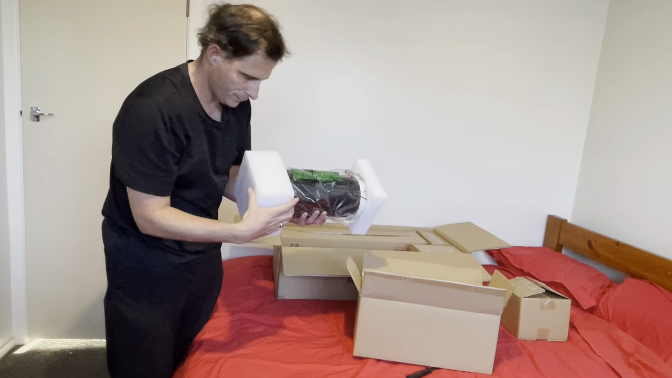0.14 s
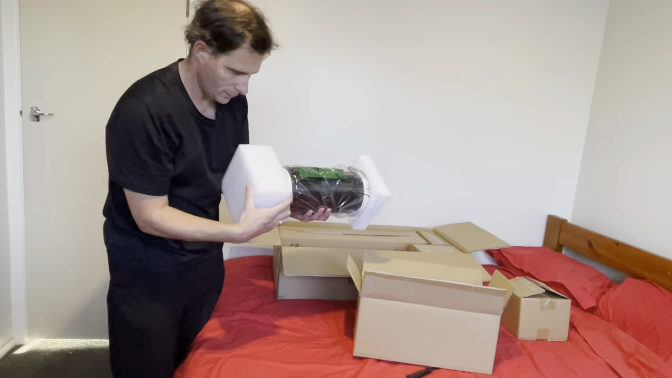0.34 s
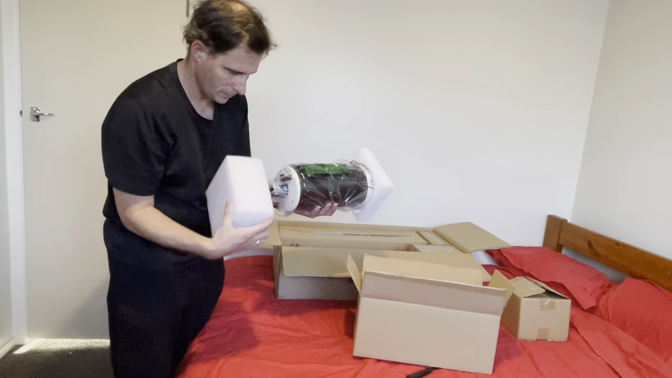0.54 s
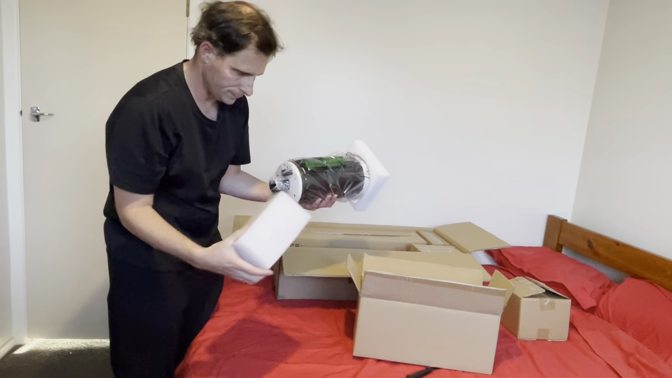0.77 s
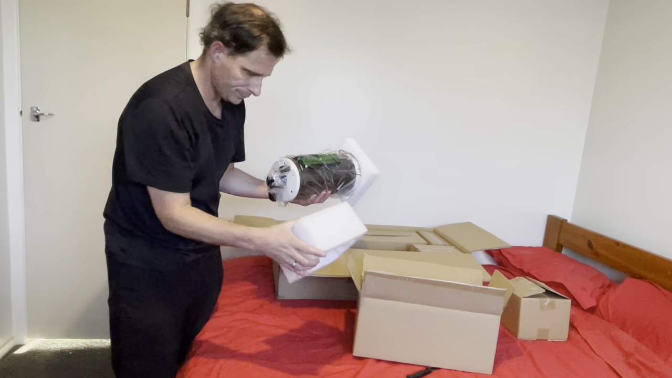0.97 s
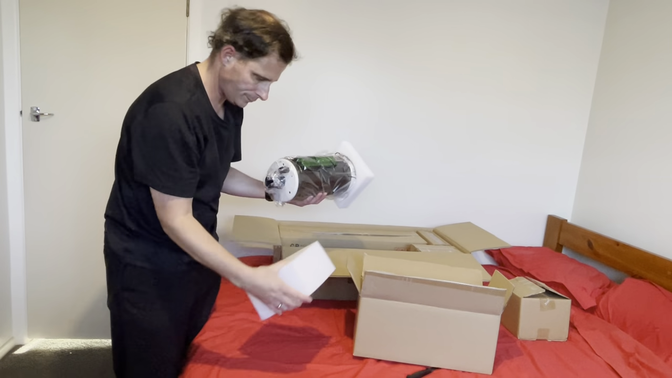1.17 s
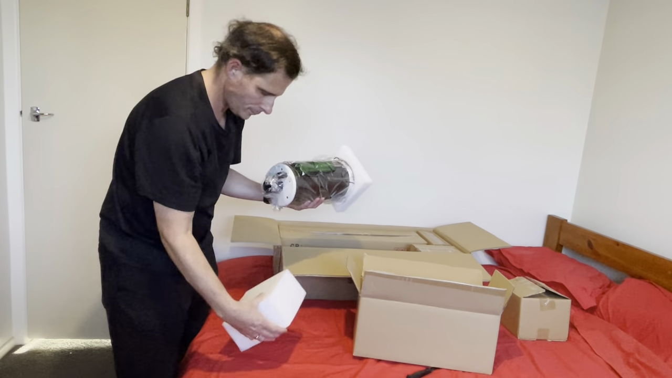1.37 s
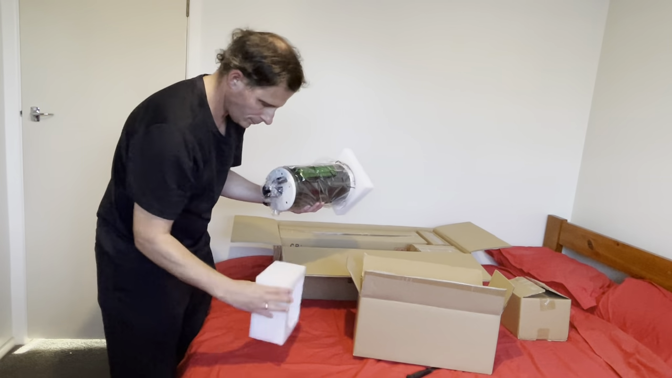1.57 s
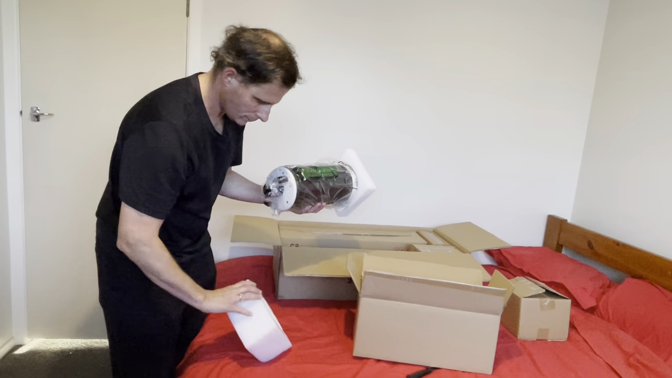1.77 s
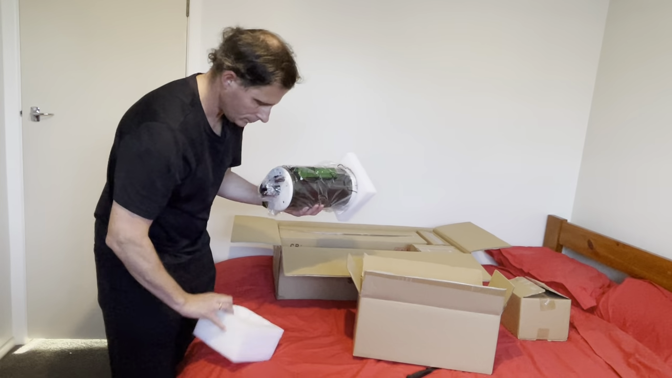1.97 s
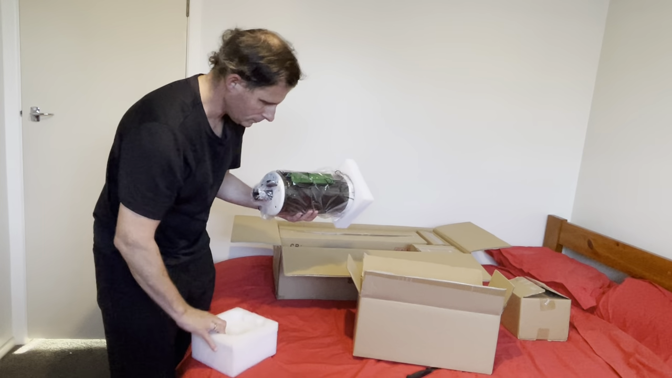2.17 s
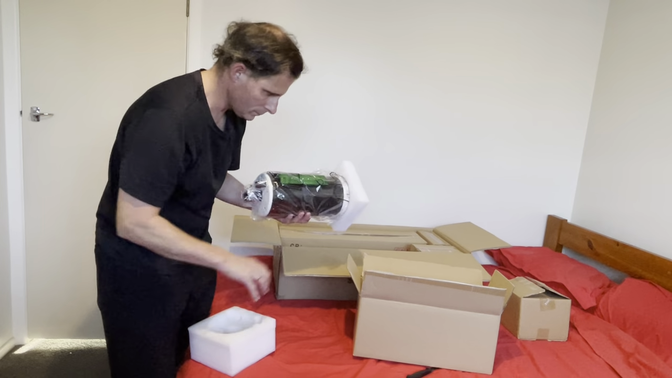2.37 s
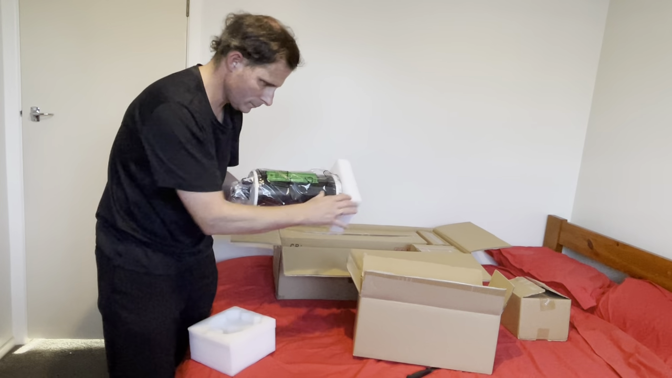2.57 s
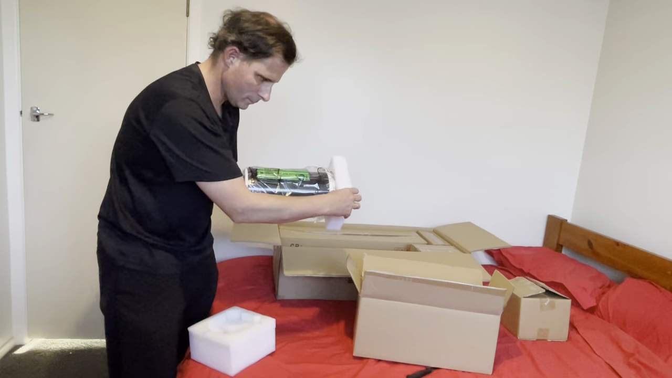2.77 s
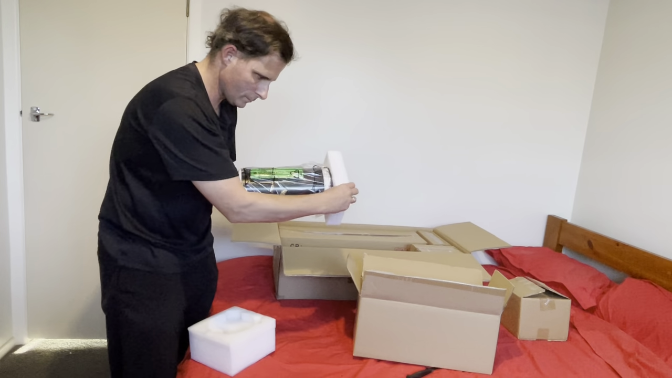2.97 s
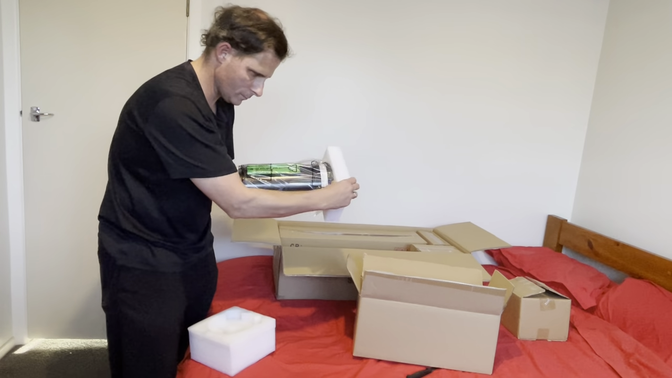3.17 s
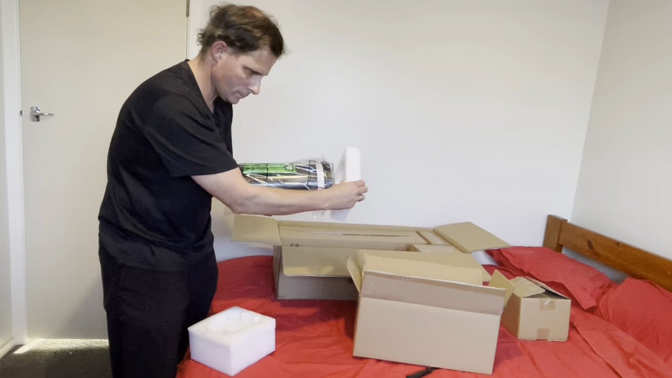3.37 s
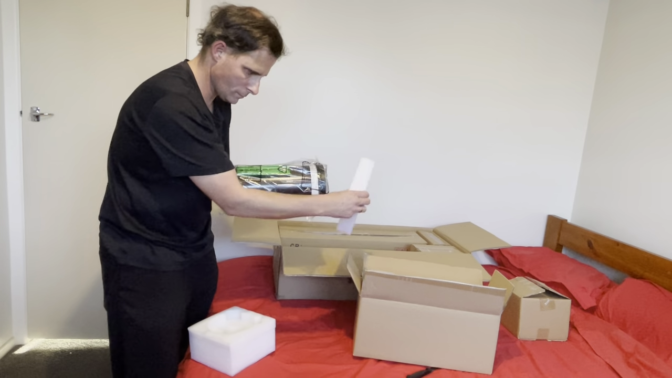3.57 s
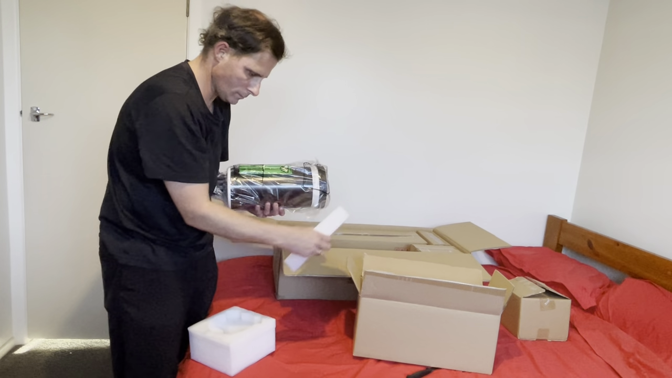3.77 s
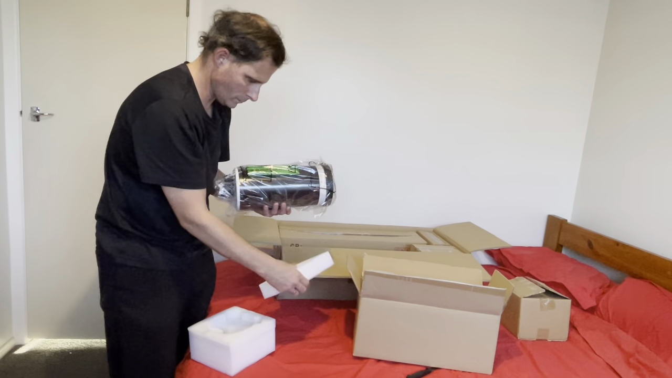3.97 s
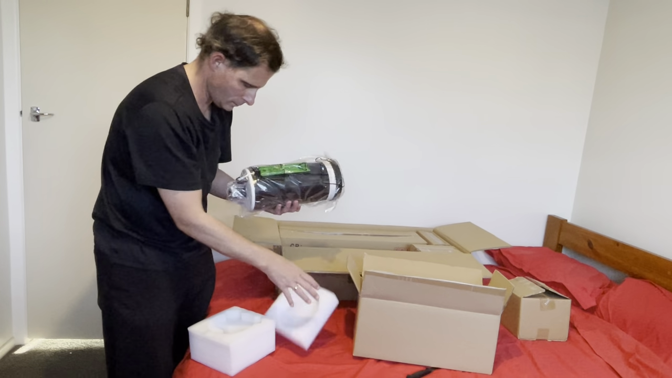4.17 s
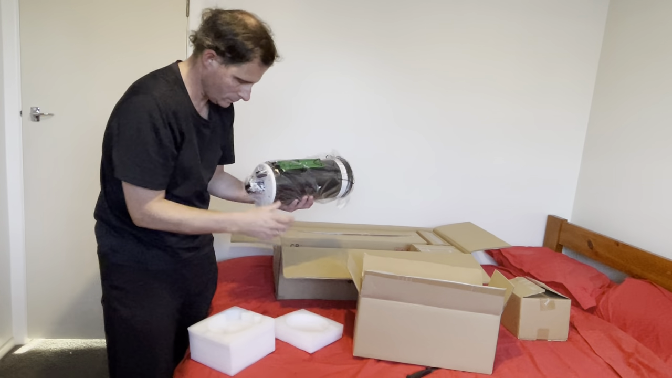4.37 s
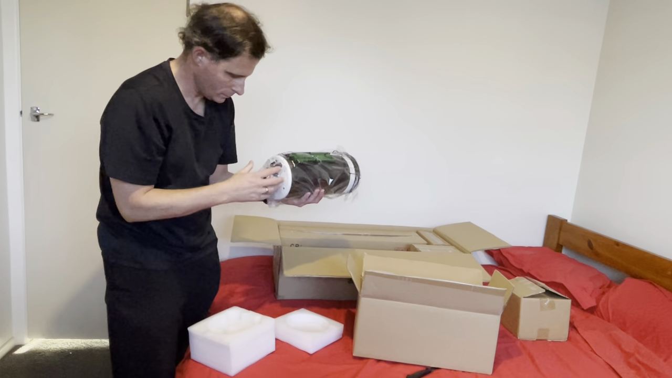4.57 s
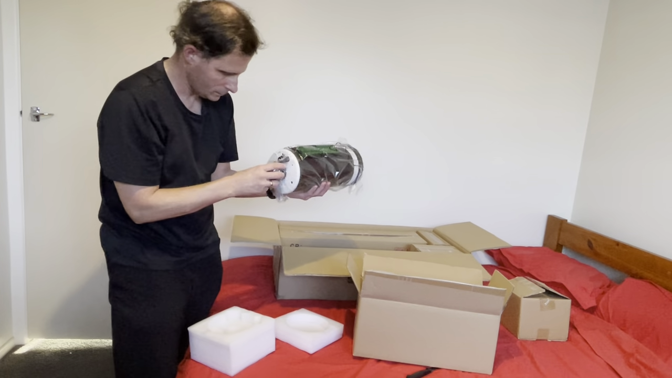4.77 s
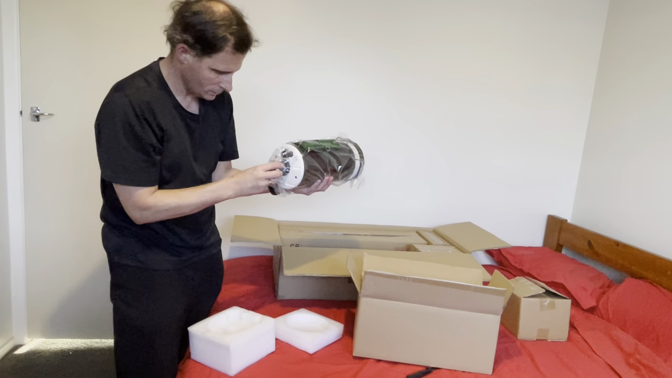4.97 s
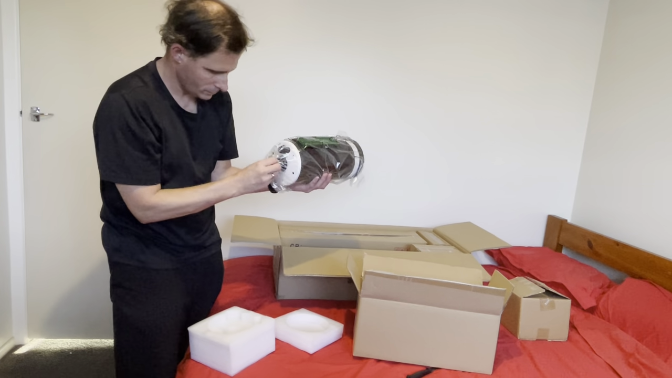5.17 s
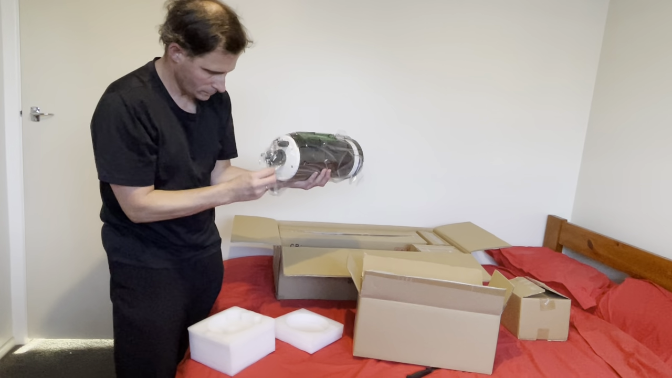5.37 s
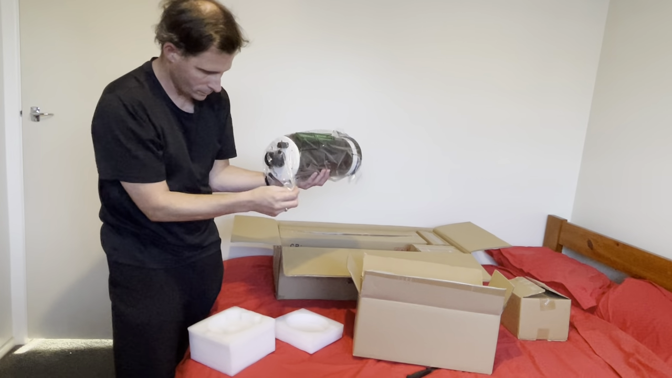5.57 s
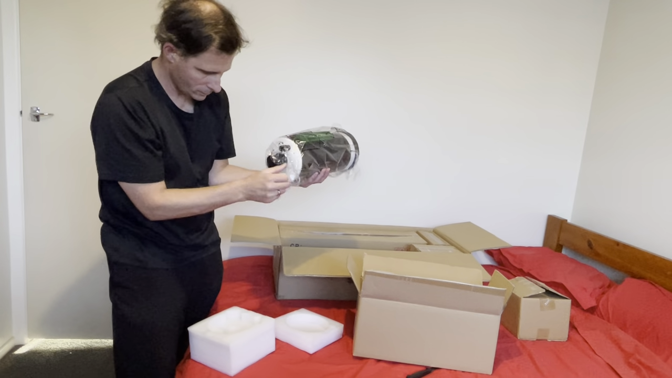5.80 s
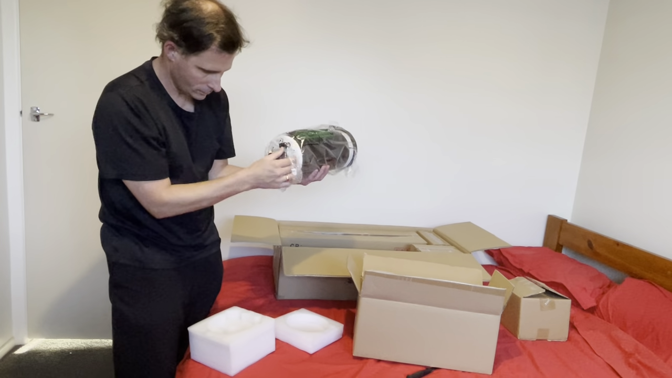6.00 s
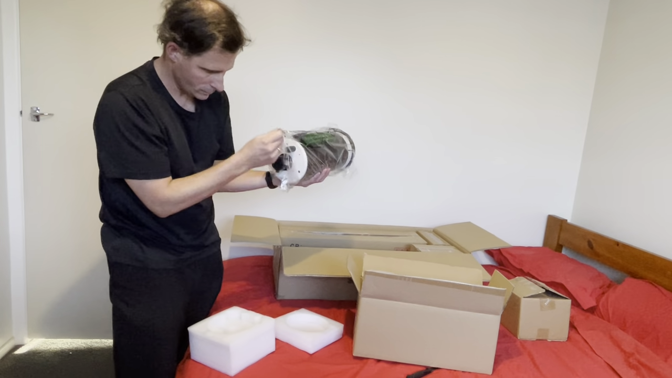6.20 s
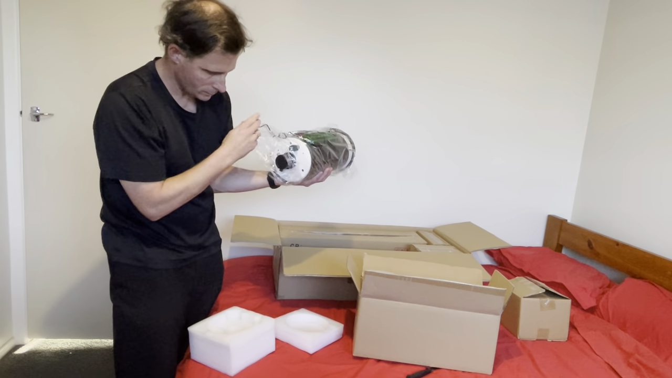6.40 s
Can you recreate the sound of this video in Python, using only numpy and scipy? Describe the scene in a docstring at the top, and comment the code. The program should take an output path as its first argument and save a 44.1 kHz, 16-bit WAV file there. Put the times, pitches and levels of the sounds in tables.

```python
"""A foam end cap scrapes and squeaks in tiny slips off a cylinder wrapped in plastic film, turns in
the hand and thuds onto a bed. The film crinkles under a fresh grip; the second cap comes off at 3.3 s
and is laid down too. From 4.5 s fingers feel for an edge, then peel the film back in countless small
buckles and a few sharp snaps. A small bedroom answers throughout, two microphones a few steps away."""
import sys
import numpy as np
from scipy import signal
from scipy.fft import rfft, irfft, next_fast_len
from scipy.io import wavfile
from scipy.ndimage import map_coordinates

SR = 44100
rng = np.random.default_rng(int(sys.argv[2]) if len(sys.argv) > 2 else 0)


def to_wav(sig):
    """Store sig (one row per channel, or 1-D mono) as 16-bit WAV at the path in sys.argv[1].

    Samples outside -1..1 are clipped; the rate is SR.
    """
    pcm = np.clip(np.atleast_2d(sig), -1, 1) * 32767
    pcm = np.round(pcm).astype(np.int16)
    wavfile.write(sys.argv[1], SR, pcm.T)  # frames by channels


N = 284114

# foam rubbing on film, hands and bedding: start_s, rise_s, fade_s, level_db, hiss_send_db, flex_send_db
FOAM_RUBS = [ (0.0, 0.0017, 0.092, -57, 4, -11), (.075, 0.022, 0.18, -57, 2.5, -7),
             (.2, 0.074, .08, -53.5, -3, -9.5), (.26, 0.089, 0.11, -45.5, -3, -9.5),
             (.516, .003, 0.09, -64, 2.5, -12), (.63, 0.026, 0.1, -71, 0, -5),
             (.745, 0.057, .05, -74, 11, -10), (.782, .036, 0.074, -59.5, -1, -12),
             (.84, 0.026, 0.12, -64, -10, -12), (1.155, 0.023, 0.05, -62.5, -1, -28),
             (1.205, 0.048, 0.13, -59, 0, -12), (1.335, 0.031, 0.11, -60.5, -3.5, -9),
             (1.44, 0.036, 0.068, -59, 0, -10), (1.535, 0.019, 0.084, -59.5, 0, -2),
             (1.703, 0.03, 0.043, -48.5, 1.5, -33), (1.74, 0.087, 0.19, -56.5, -0.5, -14),
             (1.84, 0.19, 0.041, -52, -2.5, -13.5), (2.0, 0.046, 0.052, -44.5, 0.5, -13),
             (2.068, 0.014, 0.072, -44, -3, -21), (2.14, 0.048, 0.088, -50.5, 0, -18.5),
             (2.252, 0.012, 0.034, -50.5, -2.5, -19), (3.325, 0.037, 0.063, -44.5, 0, -8.5),
             (3.372, 0.017, 0.056, -43, -0.5, -5.5), (3.496, 0.011, 0.24, -69, 3.5, -9),
             (3.973, 0.008, 0.2, -61.5, -4, -4), (4.005, 0.059, .15, -53, -0.5, -12),
             (4.215, .012, 0.063, -57, 0, 1), (4.345, 0.027, .05, -71.5, 1, -4),
             (4.382, 0.016, 0.053, -59.5, -1.5, -13)]
# fingers pressing and dragging the film: start_s, rise_s, fade_s, level_db, rustle_send_db, flap_send_db
FILM_DRAGS = [ (.95, 0.0097, 0.042, -77.5, -12, -20), (2.43, 0.026, 0.19, -70.5, -13.5, -14),
              (2.52, 0.026, 0.11, -63, -10, -30), (2.645, 0.015, .04, -60, -14, -23),
              (2.772, 0.029, 0.14, -49.5, -3.5, -10.5), (2.92, 0.048, 0.083, -53.5, -8.5, -27),
              (3.01, 0.044, 0.095, -53, -6, -18.5), (3.13, 0.011, .05, -55, -8, -22),
              (3.17, 0.043, 0.23, -53.5, -4.5, -28), (3.262, .014, 0.17, -49.5, -8, -22.5),
              (3.66, 0.018, 0.068, -64, -6, -13), (3.785, 0.015, 0.033, -66, -10, -22),
              (4.47, 0.02, 0.3, -73.5, -15, -25), (4.612, 0.027, 0.22, -57, -7, -23),
              (4.675, 0.055, 0.35, -50.5, -7.5, -22), (4.86, 0.04, 0.11, -52, -7.5, -39),
              (4.93, 0.021, 0.12, -52.5, -3.5, -24.5), (5.04, 0.041, 0.18, -52, -6.5, -21),
              (5.14, 0.021, 0.36, -55.5, -6, -25), (5.24, 0.1, 0.21, -46.5, -1, -13),
              (5.35, 0.076, 0.24, -44, -3.5, -14), (5.46, 0.039, 0.068, -42, -3, -15),
              (5.57, 0.073, 0.24, -45, -6.5, -18), (5.82, .04, 0.26, -55, -1.5, -14.5),
              (5.92, 0.07, 0.48, -51.5, -5, -21.5), (6.04, 0.069, 0.43, -43, -6, -16.5),
              (6.168, 0.01, 0.19, -40, -5, -18.5), (6.26, .11, 0.099, -40, -3.5, -20)]
# foam sticking and slipping in a rough note: start_s, length_s, start_pitch_hz, end_pitch_hz, level_db
FOAM_SQUEAKS = [(0.287, 0.085, 1600, 1135, -50.5), (0.299, 0.1, 396.4, 496, -57),
                (0.33, 0.056, 749, 1072, -53), (0.517, 0.026, 900, 830, -61),
                (1.712, 0.078, 1395, 1333, -53.5), (1.887, 0.116, 900, 777, -56.5),
                (1.894, 0.1, 1106, 1364, -63), (2.015, 0.034, 1300, 1497, -45),
                (2.075, 0.032, 1860, 2010, -44.5), (2.148, 0.055, 1457, 1303, -50),
                (2.253, 0.041, 884, 860, -62), (2.647, 0.029, 1625, 1470, -66.5),
                (3.345, 0.073, 608, 692, -52.5), (3.363, 0.051, 945, 1195, -54),
                (4.38, 0.024, 662, 690, -67)]
# creases snapping through: start_s, level_db, body_send_db
CREASE_SNAPS = [(0.2076, -39.5, -5), (0.352, -42, -19), (0.5177, -45.5, -4.5), (2.0595, -32, -2),
                (2.0818, -38, 9), (3.388, -23, -5), (4.012, -39, 2.5), (4.5772, -61, -3),
                (4.6213, -46, -15), (4.6817, -40.5, -7), (5.2812, -50, -7), (5.3934, -33, 3),
                (5.4964, -27, -1), (6.054, -36, 2.5), (6.1746, -29.5, 1), (6.1846, -18, -4.5),
                (6.208, -33, -8), (6.3444, -30, -10)]
# pinpoint ticks of taut film: start_s, level_db
FILM_TICKS = [(0.134, -33), (0.744, -46.5), (2.5495, -47), (2.6615, -38), (2.845, -45), (2.9647, -43),
              (4.358, -49), (4.4902, -48), (4.682, -35.5), (4.689, -34.5), (5.1658, -31.5), (5.2802, -34.5),
              (5.692, -27.5), (6.0988, -24)]
# soft bumps of foam, hands and bedding: start_s, pitch_hz, level_db, t60_s
SOFT_BUMPS = [(1.64, 164, -56.5, 0.047), (2.05, 166, -51.5, 0.081), (2.078, 91.5, -51, 0.091),
              (2.274, 85, -56, 0.12), (2.806, 300, -63, 0.073), (3.385, 284, -49, 0.12),
              (3.99, 222, -57, 0.19), (4.049, 262.4, -59.5, 0.4), (4.221, 636, -49, 0.089),
              (4.232, 268, -52.5, 0.11), (4.233, 90.3, -48.5, 0.07), (4.243, 54, -49, 0.092),
              (5.5, 92, -55, 0.19), (6.189, 81, -60, 0.52)]

# tone colour of each layer: frequency_hz, gain_db
SCRAPE_EQ = [(120, -33.5), (300, -19.5), (480, -2.5), (750, -0.5), (1400, -1), (2200, -1), (3300, -5),
             (7000, -52.5)]  # midrange of shaken foam cells
HISS_EQ = [(1200, -28.5), (2400, -3), (3300, 1), (4800, 0.5), (6200, 1), (7600, -4), (9300, -1.5),
           (11300, -5.5), (13000, -27.5)]  # bright skin of the foam
FLEX_EQ = [(40, -30), (90, 1), (125, -10.5), (180, 0), (285, 10.5), (430, -1.5), (900, -47.5)]  # low end of a flexing block or flapping sheet
CRINKLE_EQ = [(800, -51.5), (1800, -6), (2600, 2), (4300, 2.5), (5800, 2.5), (7400, -1), (9000, 1.5),
              (11500, -2.5), (13500, -12)]  # crisp top of buckling film
SHEET_EQ = [(150, -28), (300, -20), (400, -5), (560, -1.5), (960, -6), (1170, -0.5), (1550, -2),
            (2000, 0.5), (2900, -3), (7000, -27.5)]  # body of the rustling sheet
TICK_EQ = [(2000, -19), (5500, -3), (8500, -1), (11000, -0.5), (15000, -6)]  # thin treble of taut corners
AIR_EQ = [(20, -31), (38, -7.5), (54, 2), (70, -11), (98, -3.5), (125, -14.5), (160, -12.5), (400, -19),
          (1000, -19.5), (3000, -27.5), (10000, -31.5)]  # bass-heavy room tone

# spaced microphone ports, alike in the bass and opposed near 10 kHz: frequency_hz, likeness
PORT_LIKENESS = [(60, 0.51), (140, 0.66), (280, 0.22), (640, -0.087), (1400, -0.16), (3100, 0.15),
                 (7000, 0.14), (8800, -0.075), (9500, -0.58), (10200, -1.28), (11200, 0.17), (12300, 0.15)]
# stereo tilt of the ports: frequency_hz, left_minus_right_db
PORT_BALANCE = [(100, 0), (700, 0.5), (1300, 3), (2400, -0.5), (4400, 4), (8000, 2.5), (12000, -1)]
# overall tone colour: frequency_hz, gain_db
MASTER_EQ = [(25, -6), (48, 2), (8500, 0.5), (10100, 5.5), (11200, -1.5), (12200, -2.5), (13500, -27),
             (15500, -21)]


def foam():
    """Slips shake the foam's cells, hiss on its skin and flex the whole block."""
    scrape_gain, hiss_gain, flex_gain = stroke_envelopes(FOAM_RUBS, rise_power=0.79, fade_power=1.22)
    slips = grains(per_s=1900, spread_db=5.0, clump_db=0.3, clump_hz=160)
    cells = grains(per_s=5700, spread_db=5.0, clump_db=1.5, clump_hz=130)
    scrape = amp(1.5) * ring(slips * scrape_gain, SCRAPE_EQ)
    hiss = amp(2.5) * ring(unit(cells + 0.46 * slips) * hiss_gain, HISS_EQ)
    flex = amp(-4.5) * ring(slips * flex_gain, FLEX_EQ)
    return scrape + hiss + flex


def squeaks(width_at_1khz_hz):
    """Where the foam grips, the slips lock into a brief, rough, gliding note."""
    out = np.zeros(N)
    for start_s, length_s, start_hz, end_hz, level_db in FOAM_SQUEAKS:
        n = int(length_s * SR)
        phase = np.cumsum(2 * np.pi * np.linspace(start_hz, end_hz, n) / SR)
        width_hz = width_at_1khz_hz * np.sqrt(start_hz / 1000)  # higher notes are rougher
        knots = np.arange(n) * width_hz / SR
        cos_gain, sin_gain = (map_coordinates(row, [knots]) for row in rng.standard_normal((2, 256)))
        note = unit(cos_gain * np.cos(phase) + sin_gain * np.sin(phase))
        add(out, start_s, amp(level_db) * signal.windows.tukey(n, 0.5) * note)
    return out


def film():
    """Tiny buckles crackle over a fine sliding hiss; the larger ones also move the whole sheet."""
    crinkle_gain, rustle_gain, flap_gain = stroke_envelopes(FILM_DRAGS, rise_power=0.56, fade_power=1.35)
    buckles = grains(per_s=2600, spread_db=4.5, clump_db=2.1, clump_hz=90)
    sliding = lambda: grains(per_s=12000, spread_db=5.5, clump_db=1.0, clump_hz=67)
    crinkle = amp(3.0) * ring(unit(buckles + 0.99 * sliding()) * crinkle_gain, CRINKLE_EQ)
    rustle = amp(2.5) * ring(unit(buckles + sliding()) * rustle_gain, SHEET_EQ)
    flap = amp(-2.0) * ring(buckles * flap_gain, FLEX_EQ)
    return crinkle + rustle + flap


def snaps(t60_s):
    """A crease gives way in a very short crack that also kicks the sheet."""
    cracks, kicks = np.zeros((2, N))
    for start_s, level_db, body_send_db in CREASE_SNAPS:
        crack = amp(level_db) * burst(t60_s, length_s=0.02)
        add(cracks, start_s, crack)
        add(kicks, start_s, crack * amp(body_send_db))
    return amp(12.5) * (ring(cracks, CRINKLE_EQ) + ring(kicks, SHEET_EQ))


def ticks(t60_s):
    """Taut corners of film flip with a thin, very high tick."""
    out = np.zeros(N)
    for start_s, level_db in FILM_TICKS:
        add(out, start_s, amp(level_db) * burst(t60_s, length_s=0.01))
    return amp(12) * ring(out, TICK_EQ)


def bumps(attack_s):
    """Foam and mattress take each push with a dull, quickly damped thud."""
    out, t = np.zeros(N), np.arange(SR // 2) / SR
    for start_s, pitch_hz, level_db, t60_s in SOFT_BUMPS:
        phase = 2 * np.pi * pitch_hz * t + wobble(pitch_hz / 2)[:len(t)]  # jitter blurs the pitch
        envelope = amp(level_db - 60 * t / t60_s) * (1 - np.exp(-t / attack_s))
        add(out, start_s, envelope * np.sin(phase))
    return out


def room(dry, direct_db, spots):
    """Each instant sounds from another spot of foam or film, and so brings its own echoes."""
    out, hop = np.zeros((2, N + 2 * SR)), N // (spots - 1) + 1
    slice_samples = hop * np.arange(spots)[:, None] + np.arange(2 * hop)
    slices = np.pad(dry, (hop, 2 * hop))[slice_samples] * signal.windows.cosine(2 * hop)
    echoes = room_responses(direct_db, spots, walls_db=4.5, walls_t60_s=0.075, tail_t60_s=0.31)
    for k, wet in enumerate(signal.fftconvolve(np.float32(slices[:, None]), echoes, axes=2)):
        out[:, k * hop:k * hop + wet.shape[1]] += wet
    return out[:, hop:hop + N]


def room_responses(direct_db, spots, walls_db, walls_t60_s, tail_t60_s):
    """Direct sound, near walls and a short tail: one stereo impulse response for each spot."""
    t = np.arange(SR // 6) / SR
    predelay, left_lead = SR // 600, SR // 8000  # samples
    decay = amp(-60 * t / tail_t60_s) + amp(walls_db - 60 * t / walls_t60_s)
    decay[:predelay] = 0
    pairs = rng.standard_normal((spots, 2, len(t)), dtype=np.float32)
    pairs *= decay / np.linalg.norm(decay)
    pairs[:, 0, 0] = pairs[:, 1, left_lead] = amp(direct_db)
    return pairs / np.float32(np.hypot(1, amp(direct_db)))


def room_tone():
    """The bedroom's quiet air, a low wash of noise."""
    return unit(filtered(rng.standard_normal((2, N)), lambda hz: amp(along(AIR_EQ, hz))))


def ports(pair):
    """The two spaced microphone ports set stereo width and balance by frequency."""
    width = lambda hz: np.arccos(np.clip(along(PORT_LIKENESS, hz), -1, 1)) / 2
    mid_side = np.array([pair[0] + pair[1], pair[0] - pair[1]]) / np.sqrt(2)
    mid, side = filtered(mid_side, lambda hz: np.array([np.cos(width(hz)), np.sin(width(hz))]))
    left_right = np.array([mid + side, mid - side])
    return filtered(left_right, lambda hz: amp(np.outer([0.5, -0.5], along(PORT_BALANCE, hz))))


def stroke_envelopes(strokes, rise_power, fade_power):
    """Strokes swell as the hand presses and fade as it lets go: a main envelope and two sends."""
    t, power = np.arange(N) / SR, np.zeros((3, N))
    for start_s, rise_s, fade_s, level_db, *sends_db in strokes:
        during = slice(*np.searchsorted(t, [start_s, start_s + rise_s + 2 * fade_s]))
        age_s = t[during] - start_s
        swell = np.minimum(age_s / rise_s, 1) ** rise_power  # a power below 1 bites at once
        drop_db = 20 * (np.maximum(age_s - rise_s, 0) / fade_s) ** fade_power  # above 1 lingers
        envelope = swell * amp(level_db - drop_db)
        power[:, during] += np.outer(amp([0, *sends_db]), envelope) ** 2
    return np.sqrt(power)


def grains(per_s, spread_db, clump_db, clump_hz):
    """Random impulses of uneven size that come in clumps; rms 1."""
    fires = rng.random(N) < per_s / SR
    size_db = spread_db * np.clip(rng.standard_normal(N), -2, 2) + clump_db * wobble(clump_hz)
    return unit(fires * rng.choice([-1, 1], N) * amp(size_db))


def burst(t60_s, length_s):
    """A fast-dying noise transient; energy 1."""
    t = np.arange(round(length_s * SR)) / SR
    noise = rng.standard_normal(len(t)) * amp(-60 * t / t60_s)
    return noise / np.linalg.norm(noise)


def ring(impulses, eq, size=2048):
    """Every impulse becomes a short click of the given colour and the same energy."""
    magnitude = amp(along(eq, np.fft.rfftfreq(size, 1 / SR)))
    cepstrum = irfft(np.log(magnitude))
    cepstrum[1:size // 2] *= 2  # minimum phase keeps the attack sharp
    cepstrum[size // 2 + 1:] = 0
    click = irfft(np.exp(rfft(cepstrum)))
    return signal.fftconvolve(impulses, click / np.linalg.norm(click))[:N]


def wobble(rate_hz):
    """Smooth random modulation through rate_hz knots a second."""
    knots = rng.standard_normal(int(N * rate_hz / SR) + 4)
    return map_coordinates(knots, [np.arange(N) * rate_hz / SR])


def filtered(x, response):
    """Equalise x with a gain given as a function of frequency."""
    size = next_fast_len(x.shape[-1] + 8192)
    return irfft(rfft(x, size) * response(np.fft.rfftfreq(size, 1 / SR)), size)[..., :x.shape[-1]]


def along(curve, hz):
    """Read a breakpoint curve on a log frequency axis."""
    points_hz, values = np.transpose(curve)
    return np.interp(np.log(hz + 1), np.log(points_hz + 1), values)


def add(track, start_s, sound):
    """Mix a sound into the track at its cue."""
    part = track[max(round(start_s * SR), 0):][:len(sound)]
    part += sound[:len(part)]


def amp(db):
    """Decibels to gain."""
    return 10 ** (np.asarray(db) / 20)


def unit(x):
    """Scale to rms 1."""
    return x / np.sqrt(np.mean(x ** 2) + 1e-20)


def scene():
    """All the handling in the bedroom, over its quiet air."""
    handling = foam() + squeaks(width_at_1khz_hz=241.6)
    handling += film() + snaps(t60_s=0.0098) + bumps(attack_s=0.00054)
    air = amp(-74.5) * room_tone()
    roomy_handling = room(handling, direct_db=-5.5, spots=340)
    # the bedding soaks up the highest ticks, so they arrive drier
    drier_ticks = room(ticks(t60_s=0.0012), direct_db=-2.5, spots=20)
    return ports(roomy_handling + drier_ticks + air)


def record(dry):
    """Overall tone: deepest bass trimmed, a peak near 10 kHz, treble falling steeply above 12 kHz."""
    cutoff_hz = 15900
    return filtered(dry, lambda hz: amp(along(MASTER_EQ, hz)) * (hz < cutoff_hz))


dry = scene()
out = record(dry)
to_wav(out)
```